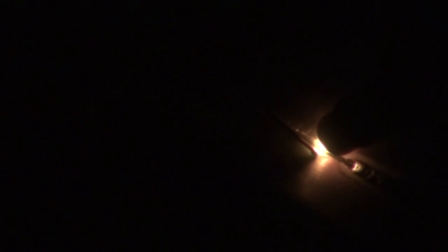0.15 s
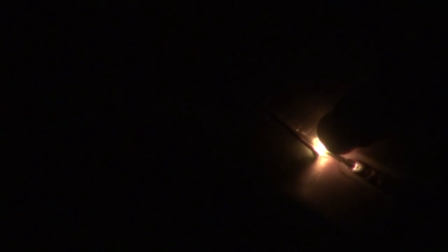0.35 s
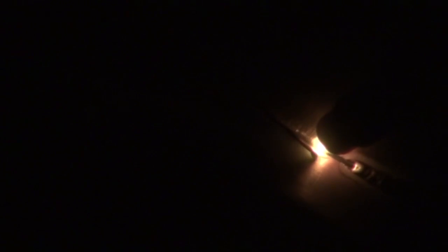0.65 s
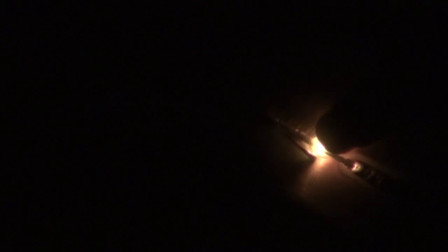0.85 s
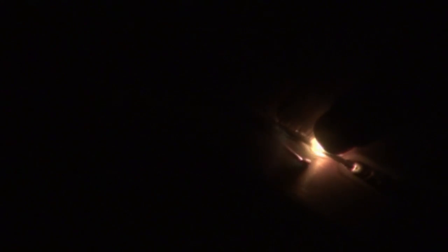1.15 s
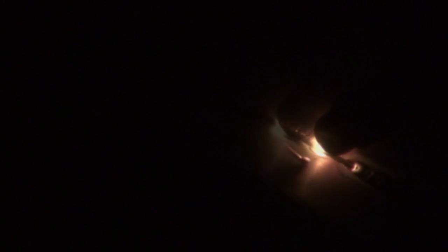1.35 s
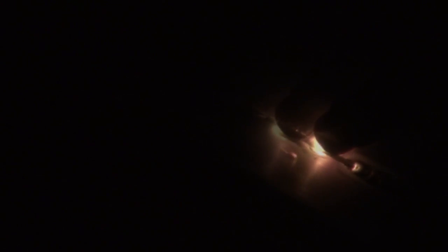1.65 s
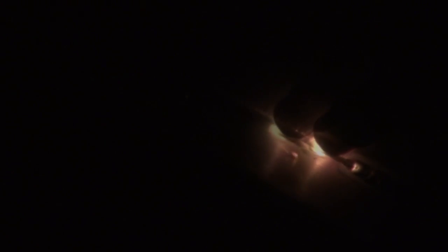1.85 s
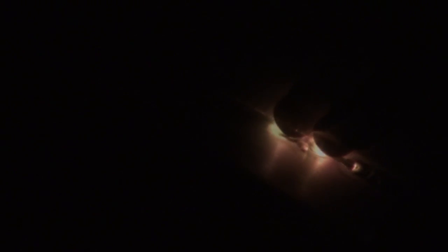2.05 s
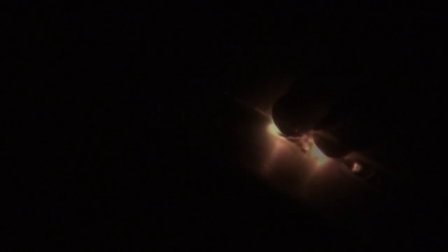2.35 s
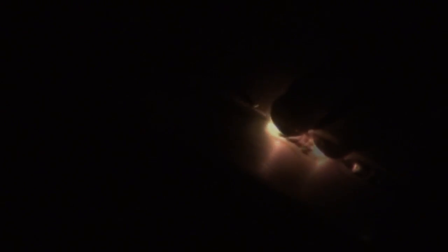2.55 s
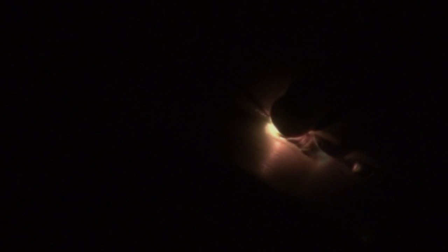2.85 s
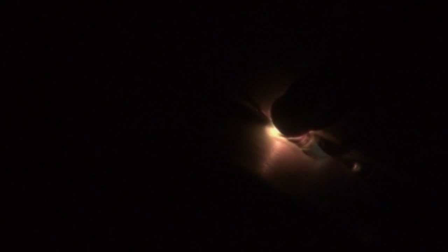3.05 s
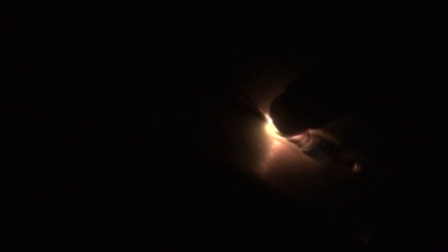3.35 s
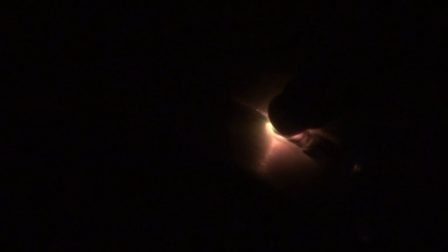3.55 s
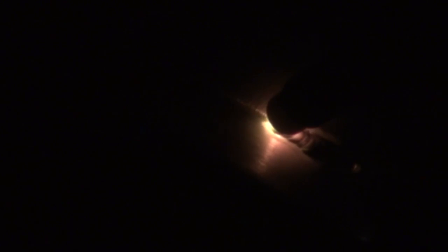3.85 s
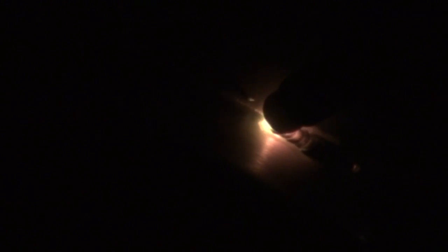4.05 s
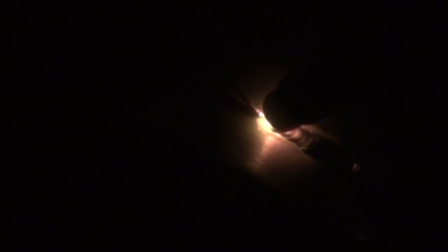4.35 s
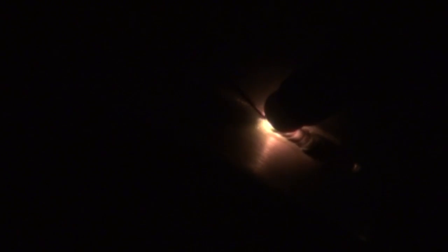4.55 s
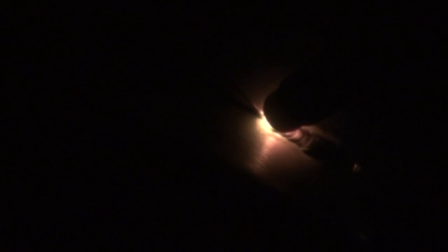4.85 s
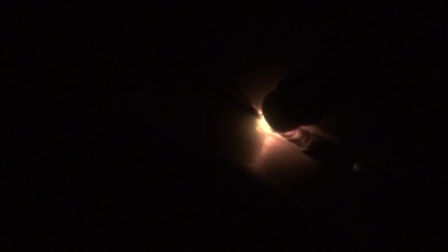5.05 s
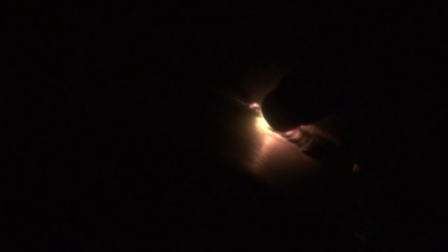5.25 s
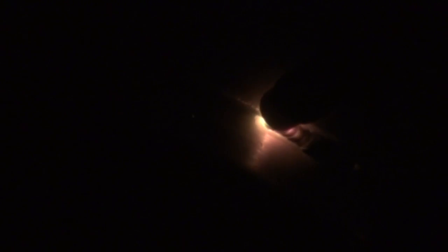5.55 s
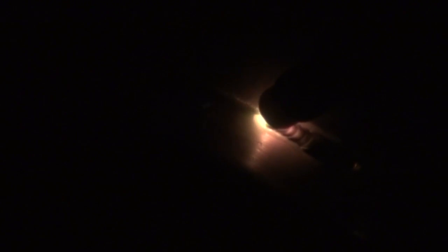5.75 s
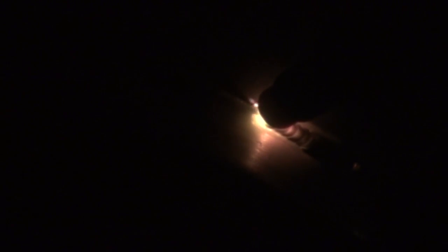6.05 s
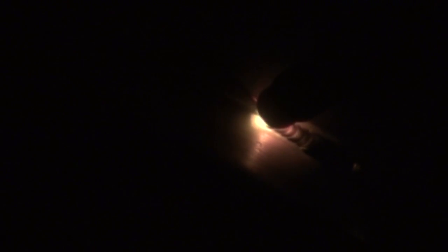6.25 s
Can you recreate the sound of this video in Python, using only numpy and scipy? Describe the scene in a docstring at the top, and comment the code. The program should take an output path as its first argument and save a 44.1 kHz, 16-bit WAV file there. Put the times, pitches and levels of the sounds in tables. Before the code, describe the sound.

A loud, harsh electric welding arc buzzes without pause on aluminum, raspy and slightly clipped, over steady gas hiss in a workshop.

```python
"""Alternating-current welding arc

An arc buzzes over aluminium in a workshop: every cycle it strikes with a sharp crack, then reverses with a
duller thump. Both are pulse shapes, echoed by nearby metal as delayed copies and by the shop as a noise tail.
Two pickups clip their hardest strikes: one buzz fades out as another, milliseconds out of step, fades in.
Beneath lie noise flaring with the pulses, steady gas and fan hiss, and a faint whine of sine tones.
"""
import sys
import numpy as np
from scipy import signal
from scipy.fft import rfft, irfft, next_fast_len
from scipy.io import wavfile
from scipy.ndimage import uniform_filter1d

SR = 44100
rng = np.random.default_rng(int(sys.argv[2]) if len(sys.argv) > 2 else 0)


def master_out(mix):
    """Clip the mix to full scale and print it as 16-bit PCM to the path in sys.argv[1]."""
    frames = np.transpose(np.atleast_2d(mix))
    ceiling = np.clip(frames, -1, 1)
    pcm = np.round(ceiling * 32767).astype(np.int16)
    wavfile.write(sys.argv[1], SR, pcm)


N = 282681


# Where in its cycle each buzz strikes, drifting as the torch moves: start_s, lag_ms
FADING_LAG = [(0, 3.33), (.37, 3.29), (.49, 3.16), (.82, 3.06), (.89, 3.11), (.99, 2.99), (1.43, 2.88),
              (1.51, 2.78), (1.86, 2.9), (1.91, 2.97), (2.03, 2.83), (2.08, 2.96), (2.44, 2.88),
              (2.56, 2.72), (2.76, 2.65), (2.91, 2.71), (3.07, 2.55), (3.3, 2.56)]
RISING_LAG = [(.98, 4.69), (1.34, 4.76), (1.46, 4.71), (1.83, 4.82), (1.98, 4.74), (2.45, 4.9),
              (2.55, 4.88), (2.66, 5.07), (2.8, 5.12), (3.0, 5.08), (3.22, 5.15), (3.3, 5.26), (3.65, 5.2),
              (4.1, 5.29)]
FADING_DB, RISING_DB = -.3, -.1
FADE_OUT_S, FADE_IN_S = (.9, 3.5), (.85, 3.2)   # from, to


def arc():
    """Power crossfade: each buzz's gain is the root of a straight ramp; the rising buzz is less steady."""
    t = np.arange(N) / SR
    fading_gain = amp(FADING_DB) * np.sqrt(np.interp(t, FADE_OUT_S, [1, 0]))
    rising_gain = amp(RISING_DB) * np.sqrt(np.interp(t, FADE_IN_S, [0, 1]))
    fading = picked_up(FADING_LAG, gain_column=1, unsteady=.4)
    rising = picked_up(RISING_LAG, gain_column=2, unsteady=1.05)
    return fading_gain * fading + rising_gain * rising


CLIP = .99


def picked_up(lag_table, gain_column, unsteady):
    """Overload: direct sound, reflections and tail pass one microphone, which flattens high peaks."""
    cracks = pulses(lag_table, unsteady)
    in_room = echoes(cracks, gain_column) + amp(SHOP_DB) * shop(cracks)
    return np.clip(microphone(in_room), -CLIP, CLIP)


# Cycles that strike harder than usual: start_s, level_db (treble peak, against HARD_REF_DB)
HARD_STRIKES = [(1.554, -23), (2.872, -23), (3.3928, -20), (3.544, -21), (3.6388, -21), (3.8189, -23),
                (3.8663, -23), (4.5572, -22), (4.9927, -20), (5.4756, -19), (5.532, -21), (5.731, -22),
                (5.958, -22), (6.1192, -21), (6.1571, -20), (6.3746, -21)]
HARD_REF_DB = -28   # treble peak of a usual strike
# The torch nudged away and back, about twice a second: centre_s, extra_lag_ms
NUDGES = [(3.92, .14), (4.35, .19), (4.91, .12), (5.4, .08), (5.88, .07)]
NUDGE_S = .07
ARC_HZ = 105.64
JITTER_MS = .008   # independent timing error of each cycle
WANDER_MS, WANDER_DB = .012, .35   # slower drift over neighbouring cycles
# Pulses of a cycle, before echoes and microphone: after_lag_ms, level_db, width_ms, jitter_db
STRIKE = (-.084, -5.2, .034, .9)
SNAP = (-.052, -22, .019, 3)   # the strike's sharp front
REVERSAL = (3.436, -9.2, .062, 1.4)


def pulses(lag_table, unsteady):
    """Quasi-periodic excitation: strike, snap and reversal recur each cycle, varying in timing and level."""
    lag_s, lag_ms = np.transpose(lag_table)
    start = np.arange(int(N / SR * ARC_HZ)) / ARC_HZ
    # columns: level of strike, snap, reversal; timing jitter; timing wander; level wander
    chance = rng.standard_normal((len(start), 6))

    # arc length drifts over some cycles; the root restores unit spread after averaging
    wander = uniform_filter1d(chance[:, 4:], size=9, axis=0) * np.sqrt(9)
    lag_ms = np.interp(start, lag_s, lag_ms)
    lag_ms = lag_ms + JITTER_MS * chance[:, 3] + WANDER_MS * wander[:, 0]
    for centre_s, extra_ms in NUDGES:
        lag_ms = lag_ms + extra_ms * np.exp(-((start - centre_s) / NUDGE_S) ** 2)
    level_db = WANDER_DB * wander[:, 1]

    # a hard strike sets the strike and snap deviations in units of the snap's jitter
    for when, peak_db in HARD_STRIKES:
        chance[int(when * ARC_HZ), :2] = (peak_db - HARD_REF_DB) / SNAP[3]

    out = np.zeros(N + 1000)
    for k, (pulse, shape) in enumerate([(STRIKE, blast), (SNAP, blast), (REVERSAL, thump)]):
        after_ms, db, width_ms, jitter_db = pulse
        at = (start + (lag_ms + after_ms) / 1000) * SR
        gain = amp(db + level_db + unsteady * jitter_db * chance[:, k])
        # sampling the shape about its exact centre keeps fractions of a sample
        index = at.astype(int)[:, None] + np.arange(-20, 21)
        offset_ms = (index - at[:, None]) / SR * 1000
        np.add.at(out, index, gain[:, None] * shape(offset_ms / width_ms))
    return out[:N]


def blast(u):
    """Gaussian first derivative: suction, then push, with peaks of 1."""
    return u * np.exp(.5 - u ** 2 / 2)


def thump(u):
    """Gaussian second derivative: one suction between two small pushes."""
    return (u ** 2 - 1) * np.exp(-u ** 2 / 2)


# Reflections off torch, work and bench: delay_ms, fading_gain, rising_gain (signed factors)
ECHOES = [(0.361, 0.31, 0.34), (0.568, 0.24, 0.24), (0.634, 0.03, 0.2), (0.838, -0.36, -0.43),
          (1.135, -0.01, -0.18), (1.471, 0.01, -0.18), (1.606, -0.15, -0.22), (1.804, -0.12, -0.19),
          (2.066, -0.11, -0.15), (2.662, 0.24, 0.25), (2.86, 0.26, 0.07), (2.954, -0.21, -0.21),
          (3.233, 0.2, 0.11), (3.497, 0.36, 0.2), (3.58, -0.01, -0.16), (3.728, 0.28, 0.29),
          (4.278, 0.28, 0.22), (4.573, 0.2, 0.2), (4.651, 0.22, 0.18), (4.796, -0.33, -0.46),
          (4.821, 0.09, 0.33), (4.927, -0.29, -0.12), (5.277, -0.06, 0.07), (5.785, 0.22, 0.1),
          (5.912, -0.17, -0.31), (8.362, 0.19, 0.21)]


def echoes(x, gain_column):
    """Superposition: each reflection is a delayed, signed copy, made by a phase turn across frequency."""
    size = next_fast_len(N + 1000)   # spare room so that delays do not wrap round
    turn_per_ms = -2j * np.pi * np.arange(size // 2 + 1) * SR / size / 1000
    paths = 1   # the direct sound
    for row in ECHOES:
        paths = paths + row[gain_column] * np.exp(turn_per_ms * row[0])
    return irfft(rfft(x, size) * paths, size)[:N]


SHOP_DB, SHOP_T60_S, SHOP_CUT_HZ = -22, .25, 9000


def shop(x):
    """Diffuse reverberation: convolution with dulled, dying noise that starts after most reflections."""
    t = np.arange(SR // 2) / SR
    tail = rng.standard_normal(len(t)) * amp(-60 * t / SHOP_T60_S) * (t > .007)
    tail = signal.sosfilt(signal.butter(2, SHOP_CUT_HZ, fs=SR, output="sos"), tail)
    unit_energy = tail / np.sqrt(np.sum(tail ** 2))
    return signal.fftconvolve(x, unit_energy)[:N]


# Bell-shaped boosts and cuts of the microphone: centre_hz, width_hz, gain_db
MIC_BELLS = [(1000, 250, 9), (1975, 4000, 9.5), (6865, 1000, 6.1), (10150, 2365, -26), (11770, 680, 7.3)]
MIC_LOW_HZ = 173


def microphone(x):
    """Frequency response: thin bass, then bells that lift the middle and dip the top."""
    x = signal.sosfilt(signal.butter(2, MIC_LOW_HZ, "high", fs=SR, output="sos"), x)
    for hz, width_hz, db in MIC_BELLS:
        x = peak(x, hz, width_hz, db)
    return x


def peak(x, hz, width_hz, db):
    """Second-order resonance: a bell-shaped boost or cut about one frequency."""
    w = 2 * np.pi * hz / SR
    a = np.sqrt(amp(db))
    alpha = np.sin(w) * width_hz / hz / 2
    zeros = [1 + alpha * a, -2 * np.cos(w), 1 - alpha * a]
    poles = [1 + alpha / a, -2 * np.cos(w), 1 - alpha / a]
    return signal.lfilter(zeros, poles, x)


SIZZLE_DB, SIZZLE_S = -29, .0009   # rms level; decay time of the pulse energy


def sizzle(cracks):
    """Amplitude modulation: a leaky sum of pulse energy makes arc noise flare and die quickly."""
    fade = np.exp(-1 / (SIZZLE_S * SR))
    energy = signal.lfilter([1], [1, -fade], cracks ** 2)
    return amp(SIZZLE_DB) * rms_one(np.sqrt(energy) * coloured(HISS))


# Noise colour shared by hiss and sizzle: pitch_hz, density_db (relative, per Hz)
HISS = [(25, -34), (100, -27), (300, -15), (600, -4), (1000, -3), (3000, .5), (5500, -1), (7000, -4),
        (9000, -18), (10200, -33), (11500, -23), (14000, -31), (16000, -33)]
HISS_DB = -30.3   # rms


def hiss():
    """Broadband turbulence: gas and fan give steady coloured noise."""
    return amp(HISS_DB) * coloured(HISS)


def coloured(spectrum):
    """Spectral shaping: white noise weighted along a log-frequency curve, rms 1."""
    hz, db = np.transpose(spectrum)
    grid = np.arange(1, N // 2 + 2) * SR / N
    weight = amp(np.interp(np.log(grid), np.log(hz), db))
    return rms_one(irfft(rfft(rng.standard_normal(N)) * weight, N))


# Low harmonics of the arc's buzz, and thin tones perhaps of a fan or cooling pump:
# pitch_hz, level_db (rms)
WHINE = [(105.6, -64), (263, -54), (281, -60), (316.9, -49), (528.2, -50), (788, -46), (1314, -48),
         (1841, -42), (2258, -44)]


def whine():
    """Additive synthesis: steady thin sine tones in random phase."""
    t = np.arange(N) / SR
    tones = np.zeros(N)
    for hz, db in WHINE:
        # root two turns rms into sine amplitude
        tones += np.sqrt(2) * amp(db) * np.sin(2 * np.pi * (hz * t + rng.random()))
    return tones


def amp(db):
    """Logarithmic level: dB to linear gain."""
    return 10 ** (np.asarray(db) / 20)


def rms_one(x):
    """Normalisation: scale the mean power to 1."""
    return x / np.sqrt(np.mean(x ** 2) + 1e-20)


def scene():
    """Superposition: the arc over sizzle, hiss and whine, in one channel."""
    cracks = arc()
    return (cracks + sizzle(cracks) + hiss() + whine())[None]


FULL_SCALE, CUTOFF_HZ = .92, 15850


def record(dry):
    """Hard limiting, then band limiting: peaks are flattened and the top is cut."""
    limited = np.clip(dry, -FULL_SCALE, FULL_SCALE)
    return signal.sosfilt(signal.cheby2(16, 70, CUTOFF_HZ, fs=SR, output="sos"), limited)


dry = scene()
out = record(dry)
master_out(out)
```